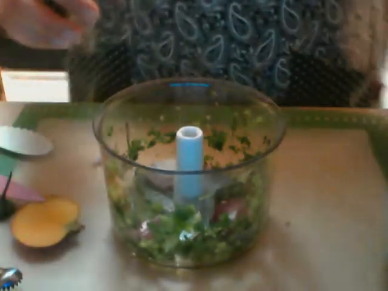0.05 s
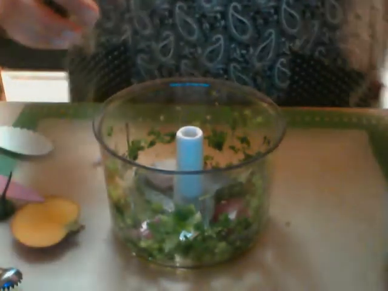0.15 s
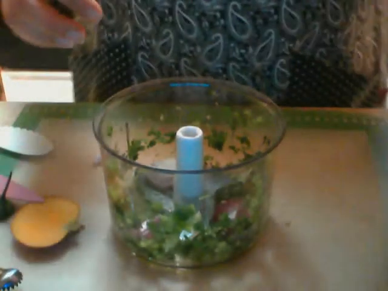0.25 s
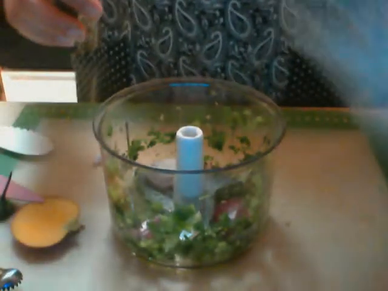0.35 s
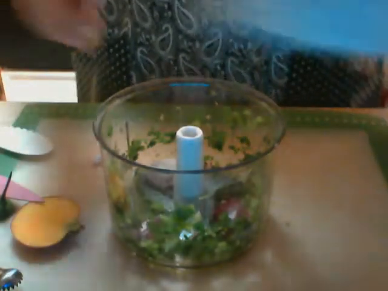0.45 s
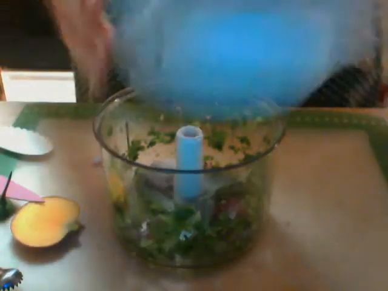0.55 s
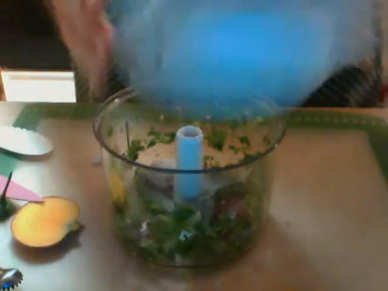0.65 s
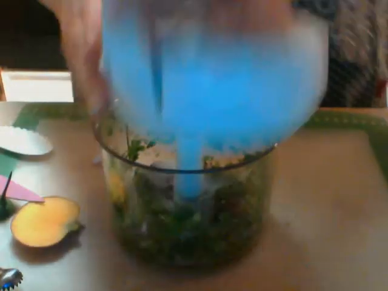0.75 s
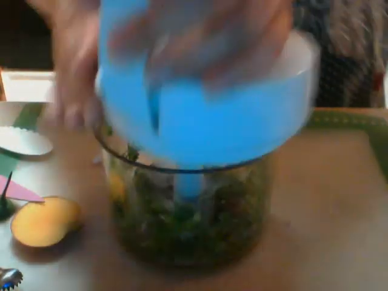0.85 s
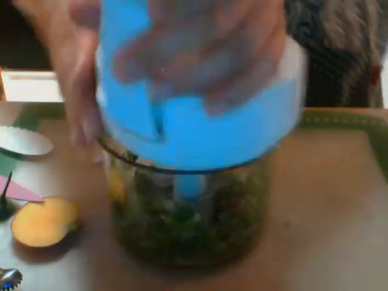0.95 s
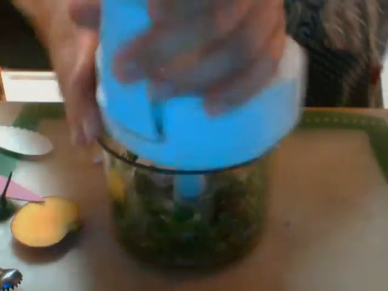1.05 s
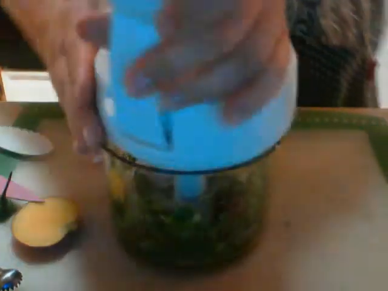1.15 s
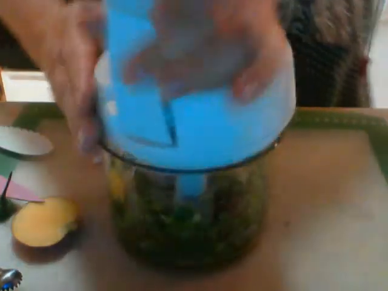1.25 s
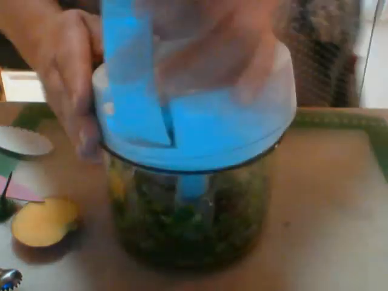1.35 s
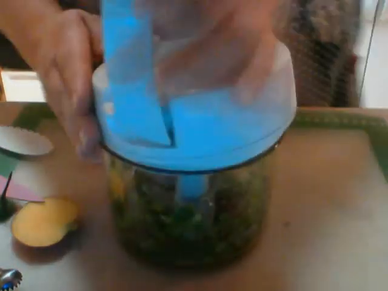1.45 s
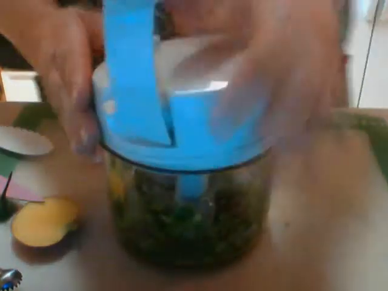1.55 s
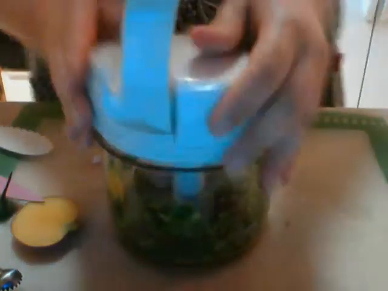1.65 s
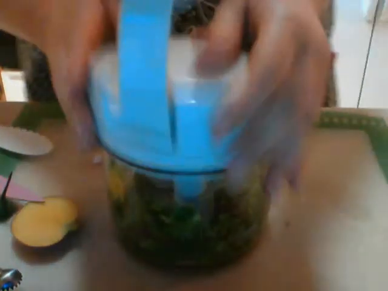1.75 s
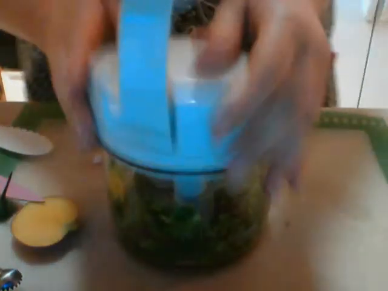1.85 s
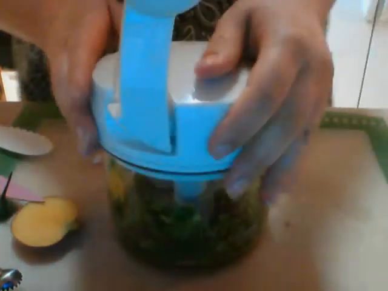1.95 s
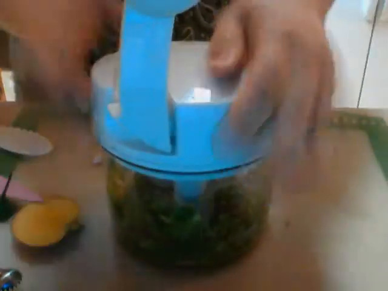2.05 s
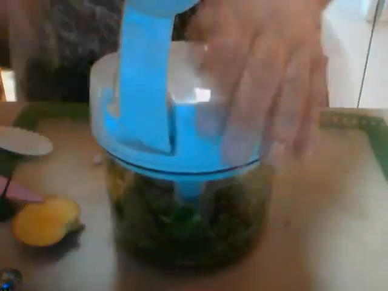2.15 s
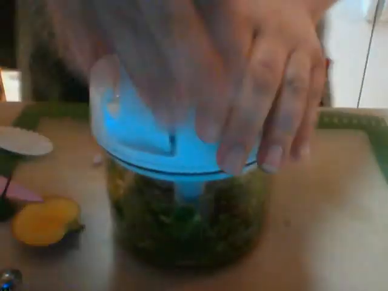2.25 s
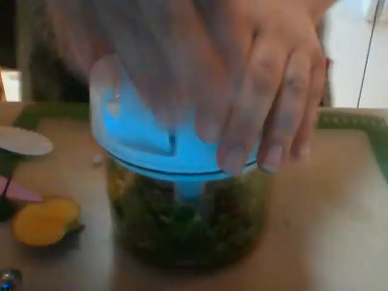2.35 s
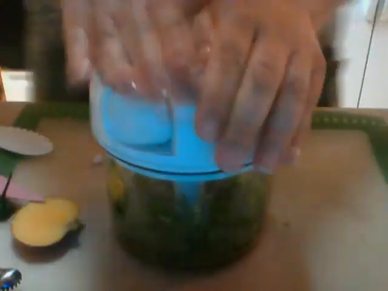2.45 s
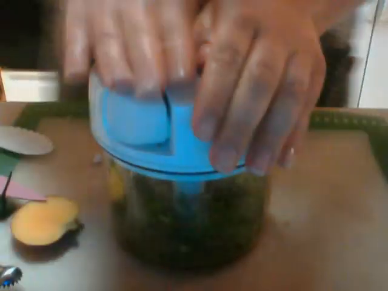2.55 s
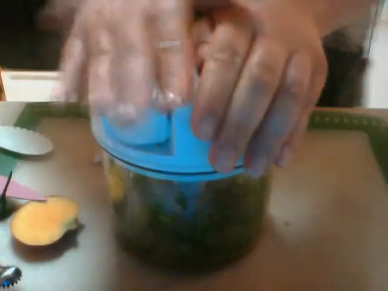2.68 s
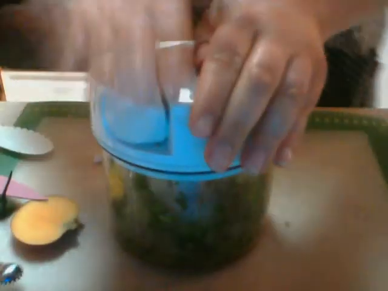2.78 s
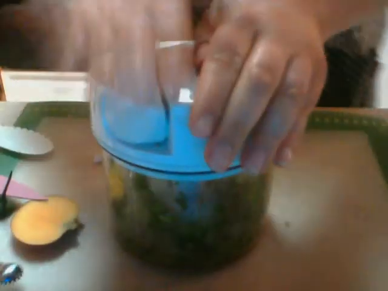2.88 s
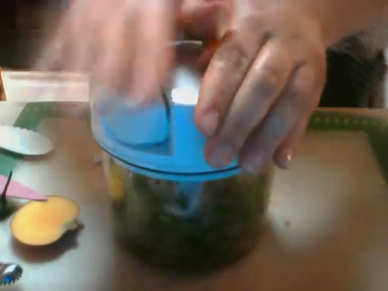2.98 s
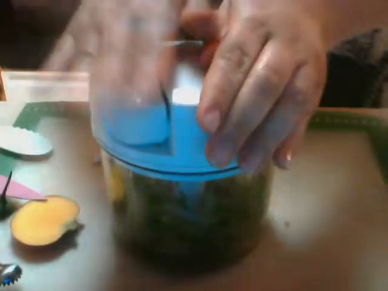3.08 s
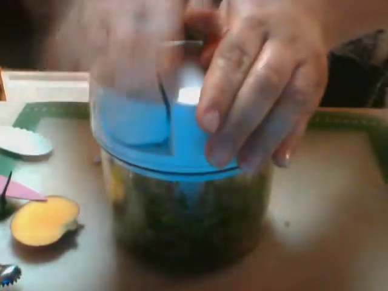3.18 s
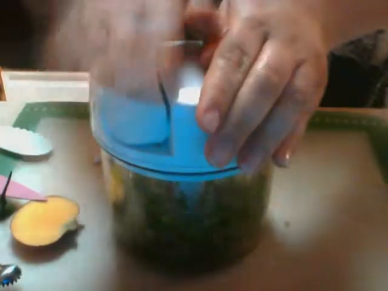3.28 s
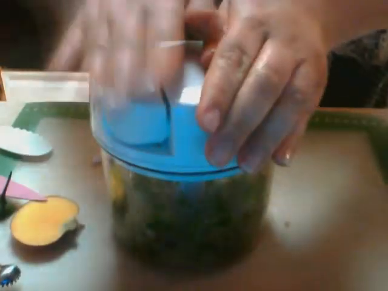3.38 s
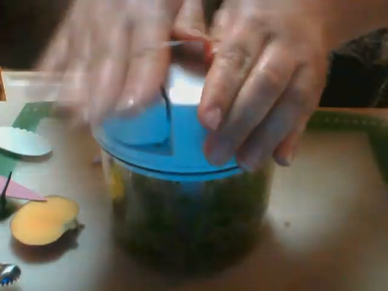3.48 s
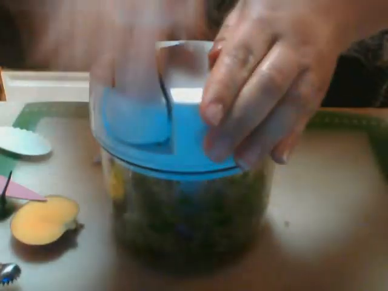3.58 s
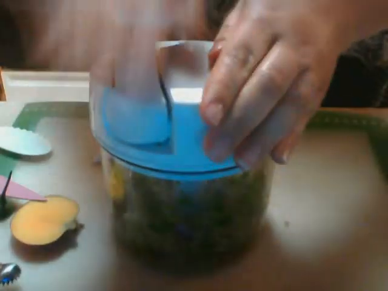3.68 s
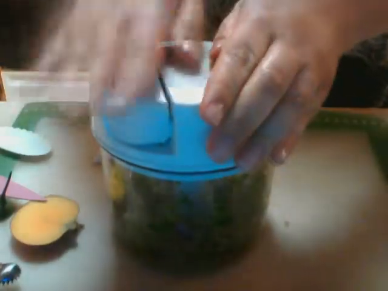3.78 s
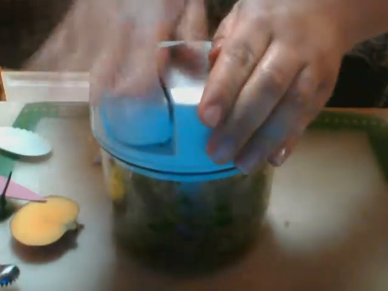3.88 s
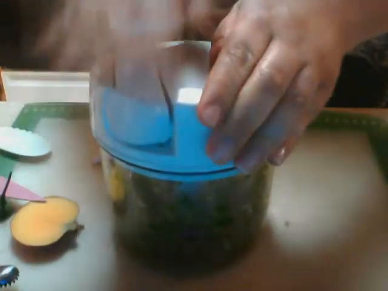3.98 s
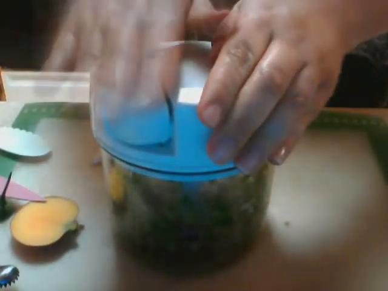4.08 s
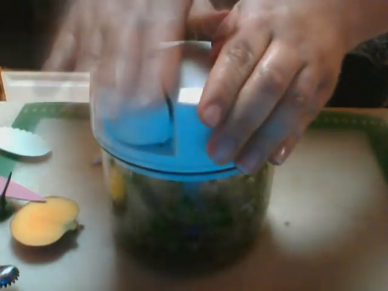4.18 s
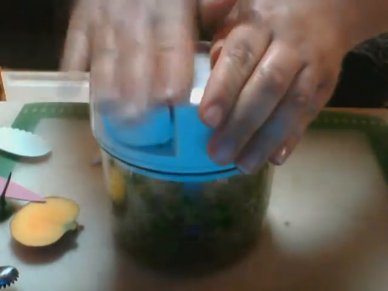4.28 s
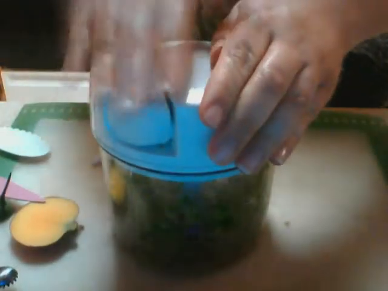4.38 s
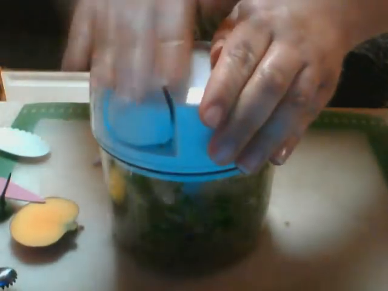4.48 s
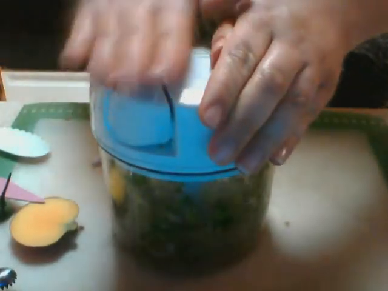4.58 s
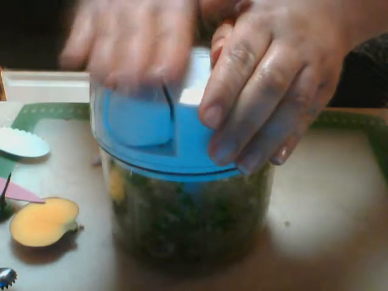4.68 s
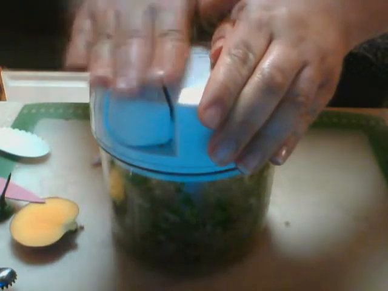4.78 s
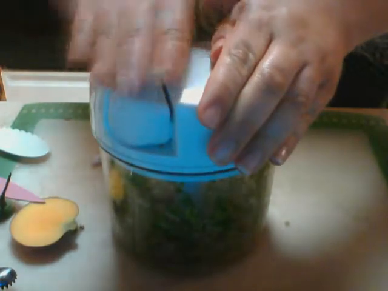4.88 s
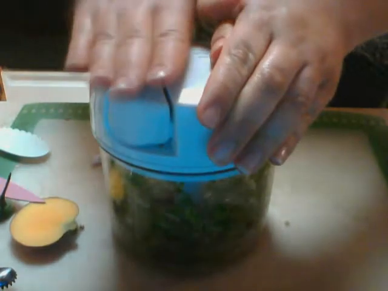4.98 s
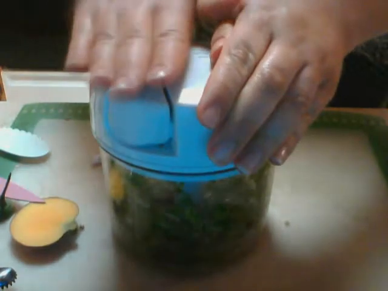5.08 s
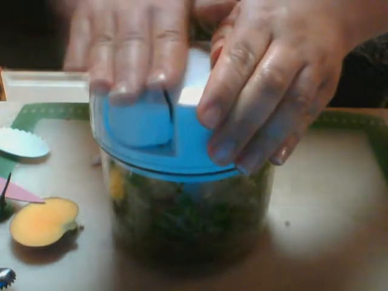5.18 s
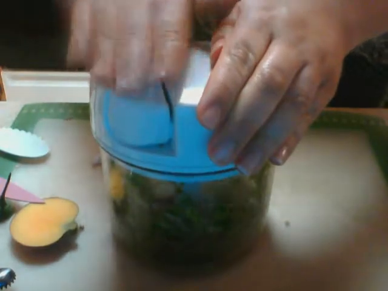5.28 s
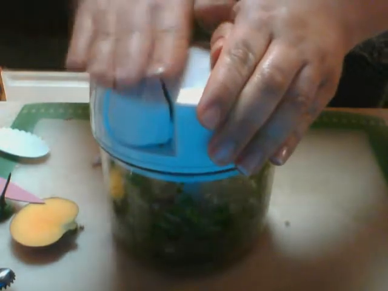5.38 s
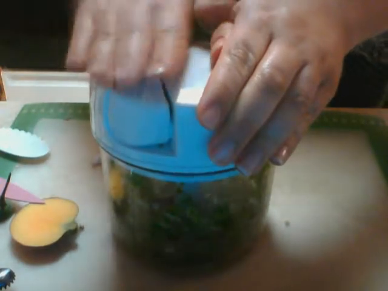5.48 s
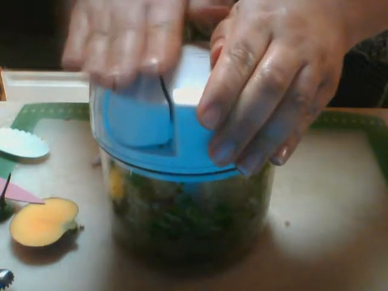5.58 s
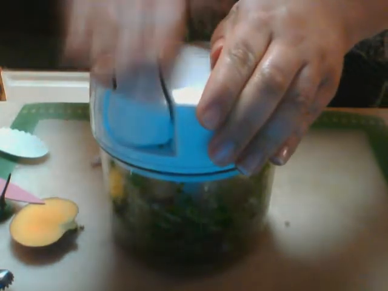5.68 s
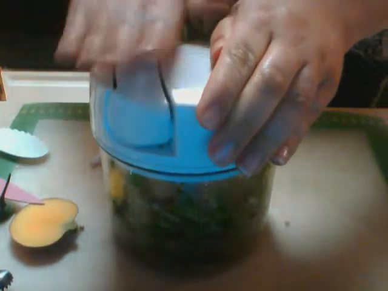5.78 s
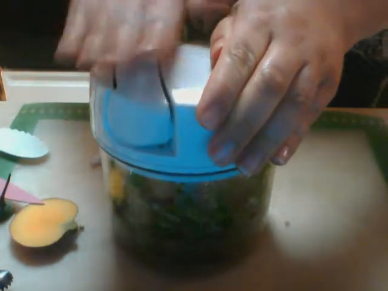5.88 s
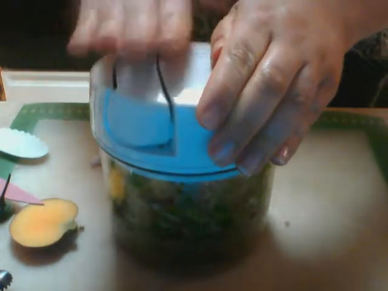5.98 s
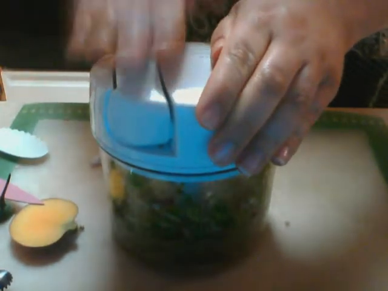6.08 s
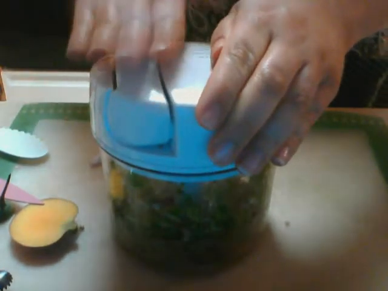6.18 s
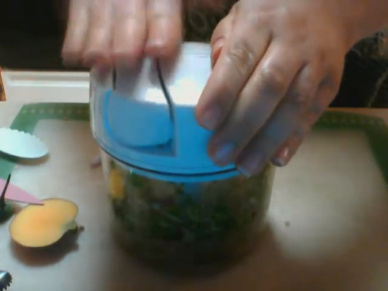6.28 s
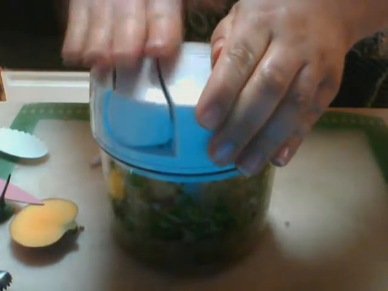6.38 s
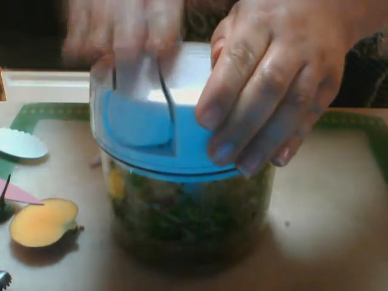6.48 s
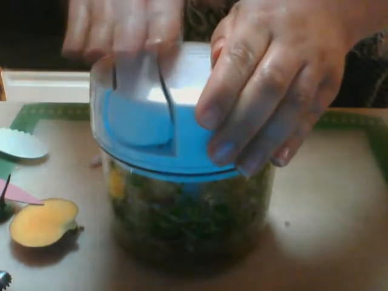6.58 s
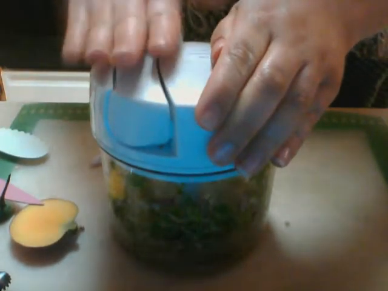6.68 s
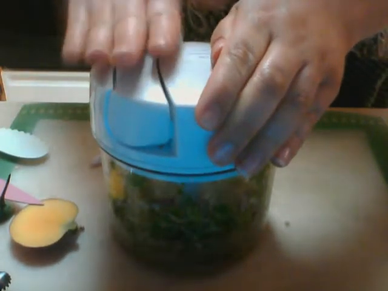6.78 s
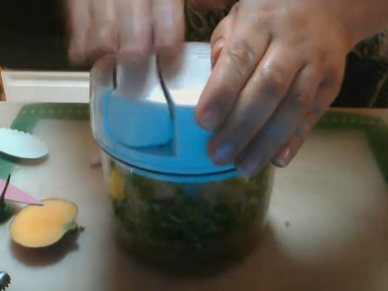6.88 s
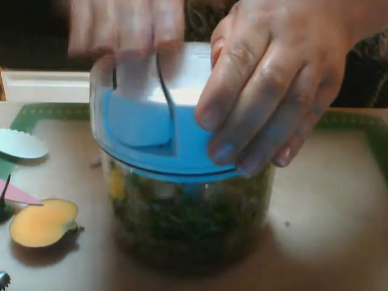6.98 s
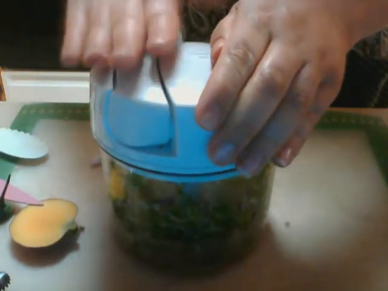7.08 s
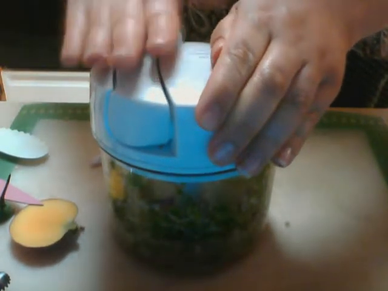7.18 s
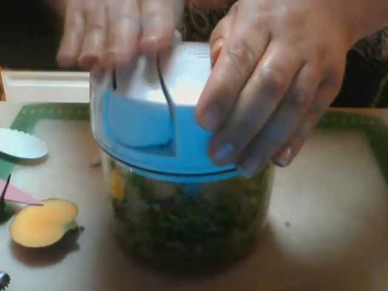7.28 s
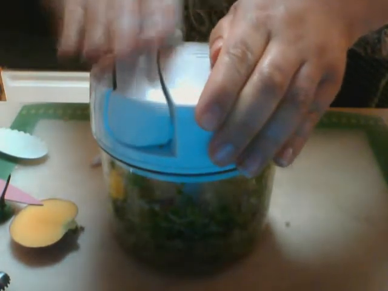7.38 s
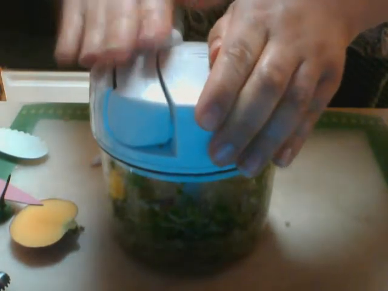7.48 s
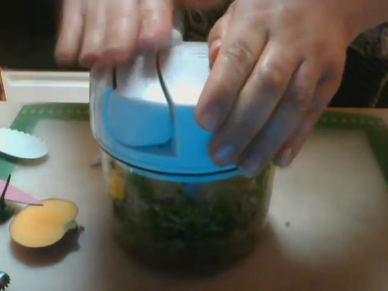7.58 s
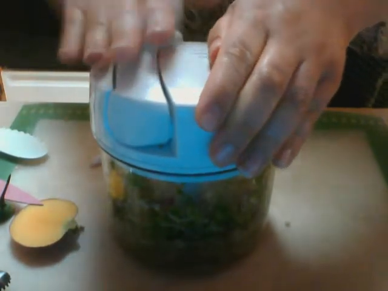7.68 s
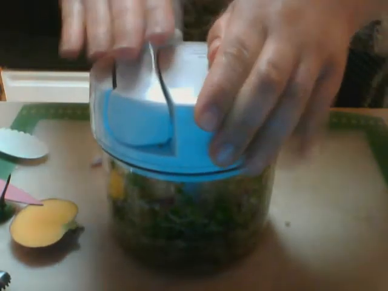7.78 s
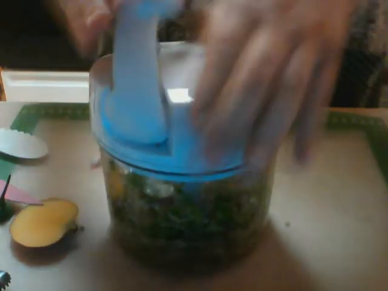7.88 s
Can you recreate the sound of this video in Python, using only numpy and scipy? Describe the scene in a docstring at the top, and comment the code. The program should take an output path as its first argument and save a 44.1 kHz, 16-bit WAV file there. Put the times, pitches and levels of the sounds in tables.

```python
"""A hand-pumped vegetable chopper on a cutting board, close to a small microphone, over faint whine and hiss.
A ring dies away and fingers rustle as the lid is lifted, set on the plastic bowl and twisted shut: noise cracks
over damped tones, with short slides. Then a palm pumps the lever: blades swish and rumble as filtered noise,
gear teeth click and grind, and each landing palm thumps the board with low damped tones. After each push the lever
springs back in a run of ratchet clicks and hits its stop. Near walls answer the handling and the pumping."""
import sys
import numpy as np
from scipy import signal
from scipy.fft import rfft, irfft, next_fast_len
from scipy.io import wavfile
from scipy.ndimage import uniform_filter1d, map_coordinates

SR = 44100
rng = np.random.default_rng(int(sys.argv[2]) if len(sys.argv) > 2 else 0)


def master_out(mix):
    """Clip the mix to full scale and print it as 16-bit PCM to the path in sys.argv[1]."""
    frames = np.transpose(np.atleast_2d(mix))
    ceiling = np.clip(frames, -1, 1)
    pcm = np.round(ceiling * 32767).astype(np.int16)
    wavfile.write(sys.argv[1], SR, pcm)


N = 350230


def amp(db):
    """dB to gain."""
    return 10 ** (np.asarray(db) / 20)


def unit(x):
    """Scaled to rms 1."""
    return x / np.sqrt(np.mean(x ** 2) + 1e-20)


def noise():
    """White noise as long as the scene."""
    return rng.standard_normal(N)


def along(points, hz):
    """Read (frequency [Hz], value) points on a log frequency axis."""
    f, v = np.transpose(points)
    return np.interp(np.log(hz + 1), np.log(f + 1), v)


def peaks(table, hz):
    """Colour in dB of resonances (frequency [Hz], width [Hz], level [dB])."""
    return sum(db / (1 + (2 * (hz - centre) / width) ** 2) for centre, width, db in table)


def wobble(rate):
    """A smooth random curve with rate knots a second."""
    knots = rng.standard_normal(int(N * rate / SR) + 4)
    return map_coordinates(knots, [np.arange(N) * rate / SR])


def coloured(x, db_of):
    """x through the causal, minimum-phase filter whose gain in dB is db_of(Hz)."""
    m = next_fast_len(N + SR // 2) * 2
    gain_db = np.maximum(db_of(np.fft.rfftfreq(m, 1 / SR)), -120)
    cepstrum = irfft(np.log(amp(gain_db)), m)
    # folding the cepstrum forward keeps all of the response after the blow
    cepstrum = np.concatenate([cepstrum[:1], 2 * cepstrum[1:m // 2], np.zeros(m // 2)])
    return irfft(rfft(x, m) * np.exp(rfft(cepstrum)), m)[:N]


def bursts(times, db, t60, rise):
    """Envelope of blows that rise fast and die away; energies add."""
    power, t = np.zeros(N + SR), np.arange(SR // 5) / SR
    for s, level, life in zip(times, db, np.broadcast_to(t60, len(times))):
        blow = amp(level - 60 * t / life) * (1 - np.exp(-t / rise))
        power[round(s * SR):][:len(t)] += blow ** 2
    return np.sqrt(power[:N])


def rings(times, db, hz, t60, rise):
    """One damped tone for each blow."""
    out, t = np.zeros(N + SR), np.arange(SR // 4) / SR
    for s, level, f, life in np.broadcast(times, db, hz, t60):
        envelope = amp(level - 60 * t / life) * (1 - np.exp(-t / rise))
        out[round(s * SR):][:len(t)] += envelope * np.sin(2 * np.pi * f * t)
    return out[:N]


def stretches(start, end, db, fade_db):
    """Envelope of steady friction that sags by fade_db; 2 ms smoothing rounds both edges."""
    level = np.zeros(N)
    for a, b, top in zip(start, end, db):
        a, b = round(a * SR), round(b * SR)
        level[a:b] = amp(top - np.linspace(0, fade_db, b - a))
    fade = np.exp(-1 / (0.002 * SR))
    return signal.lfilter([1 - fade], [1, -fade], level)


def split(hz, side):
    """dB of one half of the band around 2100 Hz: positive keeps the bright crack, negative the mid clack."""
    return -10 * np.log10(1 + (2100 / (hz + 1)) ** (6 * side))


def clatter(crack, clack, colour):
    """Plastic on plastic: noise under a bright and a mid envelope, ringing in the given colour."""
    out = 0
    for side, envelope in ((1, crack), (-1.11, clack)):
        half = lambda hz: colour(hz) + split(hz, side)
        loudness = np.std(coloured(noise(), half))
        out = out + coloured(envelope * noise(), half) / loudness
    return out


# hiss colour: (frequency [Hz], relative level [dB])
HISS = [(35, -78), (60, -39), (202, -11), (413, -12.5), (478, -9), (565, -16), (916, -15), (2720, -22.5),
        (6300, -19.5), (9000, -35.5), (11700, -66.5), (19800, -120)]
# thin steady tones: (frequency [Hz], level before WHINE_LIFT_DB [dB])
WHINE = [(296.1, -96), (484.5, -85.5), (635.2, -93), (1082, -100.5), (2164, -102), (4867, -100),
         (5992, -104), (6487, -101)]
HISS_DB, WHINE_LIFT_DB = -76.5, 7.5  # hiss in dB rms


def background():
    """Coloured-noise hiss and a few thin sine tones, slightly wavering in level."""
    t = np.arange(N) / SR
    tones = 0
    for hz, db in WHINE:
        tones = tones + amp(db + WHINE_LIFT_DB + 1.5 * wobble(8)) * np.sin(2 * np.pi * hz * t)
    return tones + amp(HISS_DB) * unit(coloured(noise(), lambda hz: along(HISS, hz)))


# one ring dying away as the scene opens: (time [s], level [dB], frequency [Hz], t60 [s])
FADING_TONE = (0, -46, 1450, .25)


def fading_tone():
    """A single damped resonance."""
    at, db, hz, t60 = FADING_TONE
    return rings(at, db, hz, t60, .002)


# fingers sliding on the lid, one list per touch: (time [s], level before RUSTLE_LIFT_DB [dB])
RUSTLE = [
    [(0.0, -49.5), (0.098, -52), (0.12, -49), (0.234, -76), (0.3, -80)],
    [(1.56, -69.5), (1.638, -58.5), (1.756, -47), (1.776, -51), (1.814, -33), (1.896, -48), (1.936, -65),
     (2.0, -74.5)],
]
RUSTLE_LIFT_DB = 3


def rustle():
    """Dull, lumpy friction of skin on plastic."""
    t = np.arange(N) / SR
    level = sum(amp(np.interp(t, *np.transpose(touch), left=-120, right=-120)) for touch in RUSTLE)
    # (frequency [Hz], relative level [dB])
    skin = [(120, -29), (300, 2), (800, 2.5), (1600, -6), (3500, -24), (7000, -30), (9000, -73)]
    lumpy = amp(4.6 * wobble(54)) * noise()
    return amp(RUSTLE_LIFT_DB) * level * unit(coloured(lumpy, lambda hz: along(skin, hz)))


# the hardest knock snaps brightly: (time [s], level [dB], frequency [Hz], t60 [s])
SNAP = (0.1932, 5, 5300, .005)


def snap():
    """A very short, high damped tone."""
    at, db, hz, t60 = SNAP
    return rings(at, db, hz, t60, .0003)


# lid sliding on the rim: (start [s], end [s], bright level [dB], mid level [dB])
SLIDES = [(.205, .265, -51, -48), (.96, 1.023, -56, -54), (1.329, 1.45, -41, -39), (1.574, 1.64, -52, -54),
          (1.844, 1.95, -40, -38)]
SLIDE_FADE_DB = 23  # from its start to its end


def slides():
    """Bright and mid envelopes of grainy friction, fading as the lid slows down."""
    start, end, bright_db, mid_db = np.transpose(SLIDES)
    grain = amp(2.2 * wobble(150))
    bright = grain * stretches(start, end, bright_db, SLIDE_FADE_DB)
    mid = grain * stretches(start, end, mid_db, SLIDE_FADE_DB)
    return bright, mid


# handling knocks; hollow and wall pitch change with how the lid is held and how far it covers the bowl:
# (time [s], bright crack [dB], mid clack [dB], hollow level [dB], hollow pitch [Hz], wall level [dB],
# wall pitch [Hz])
KNOCKS = [(0.0074, -42, -37.5, -35.5, 262, -40.5, 736), (0.0454, -33, -25, -34, 259, -36, 1202),
          (0.0575, -34.5, -30, -31, 240, -34, 750), (0.1395, -44, -31, -23.5, 334, -28, 760),
          (0.1516, -58.5, -41.5, -23.5, 330, -22, 792), (0.1643, -61.5, -36.5, -20.5, 260, -22, 677),
          (0.1927, -8, -14, -5, 301, -15, 705), (0.198, -26, -20, -9.5, 312, -15, 628),
          (0.7877, -43.5, -75, -75.5, 472, -75, 740), (0.8854, -53.5, -56, -74, 488, -69, 660),
          (0.9525, -32.5, -30, -25, 580, -18.5, 622), (0.961, -56, -34.5, -18.5, 491, -20.5, 610),
          (0.9903, -56, -55, -34.5, 423, -30, 646), (1.034, -74.5, -55, -40.5, 430, -41.5, 860),
          (1.076, -39.5, -32, -33, 490, -31, 810), (1.1931, -37, -34, -24, 471, -47, 1110),
          (1.228, -33, -34, -17, 473, -32, 830), (1.278, -59, -51, -35.5, 488, -39, 622),
          (1.291, -46.5, -39, -37, 453, -33.5, 630), (1.3068, -33.5, -20, -13.5, 464, -19, 633),
          (1.3131, -19.5, -19.5, -5.5, 384, -14.5, 1013), (1.351, -50, -44, -28, 400, -27, 633),
          (1.4053, -64, -52, -31, 370, -37, 676), (1.4605, -77, -62, -41.5, 422, -44, 630),
          (1.587, -41, -37, -34.5, 372, -35.5, 880), (1.6094, -47, -34, -27.5, 400, -21.5, 1010),
          (1.6448, -41.5, -33, -16, 381, -20.5, 728), (1.703, -67, -43, -28, 463, -23, 1077),
          (1.721, -68, -38, -25, 475, -23, 950), (1.7552, -58, -37, -27, 434, -36, 730),
          (1.7781, -28, -32, -20.5, 424, -29, 1217), (1.7967, -20.5, -15, -24, 370, -29, 785),
          (1.8174, -25.5, -26, -22, 383, -19.5, 1500), (1.8312, -26.5, -25, -22, 422, -21, 640),
          (1.8429, -21.5, -18.5, -20.5, 242, -22, 748), (1.957, -52.5, -55, -51, 480, -53, 650),
          (2.1868, -51, -41, -49, 477, -55.5, 858), (2.2797, -77, -65, -66, 610, -55.5, 1120),
          (2.31, -55, -43, -62, 483, -50, 1180), (2.343, -48, -34, -31, 430, -33, 1090),
          (2.377, -35.5, -30, -33, 540, -24.5, 760)]
# colour of a knock: (frequency [Hz], relative level [dB])
RIM = [(500, -13), (1200, -0.5), (1700, -3.5), (2800, -3.5), (4500, -5), (6000, -4), (7300, -16),
       (8800, -50), (12000, -100)]
# rim resonances: (frequency [Hz], width [Hz], level [dB])
RIM_PEAKS = [(1600, 300, 4), (2700, 200, 7), (4200, 300, 4), (5800, 400, 4)]
HOLLOW_T60, WALL_T60, CLACK_T60 = .064, .04, .039  # s
CRACK_T60 = .028  # s, for a crack at -40 dB
HARD_SHORTER = .08  # dB of crack length lost for each dB above -40: hard blows are brief


def knocks():
    """The lid meets the rim: the air in the bowl and the wall ring under each crack."""
    s, crack_db, clack_db, hollow_db, hollow_hz, wall_db, wall_hz = np.transpose(KNOCKS)
    hollow = rings(s, hollow_db, hollow_hz, HOLLOW_T60, 0.00091)
    wall = rings(s, wall_db, wall_hz, WALL_T60, 0.00058)
    crack_t60 = CRACK_T60 * amp(-HARD_SHORTER * (crack_db + 40))
    bright_slide, mid_slide = slides()
    crack = np.hypot(bursts(s, crack_db, crack_t60, 0.00074), bright_slide)
    clack = np.hypot(bursts(s, clack_db, CLACK_T60, 0.00073), mid_slide)
    rim = lambda hz: along(RIM, hz) + peaks(RIM_PEAKS, hz)
    return hollow + wall + snap() + clatter(crack, clack, rim)


# decay of the walls' answer: (frequency [Hz], t60 [s])
KITCHEN = [(150, 0.19), (500, 0.16), (2000, 0.091), (7000, 0.052)]


def kitchen(x):
    """The near walls answer, each frequency dying at its own speed; overlapping slices get fresh random tails."""
    out, step = np.zeros(N + SR), SR // 8
    window = np.hanning(2 * step)
    x = np.pad(x, (step, 2 * step))
    for at in range(0, N + step, step):
        hz, t, z = signal.stft(rng.standard_normal(SR // 3), SR, nperseg=256)
        decay = amp(-60 * t / along(KITCHEN, hz)[:, None])
        tail = signal.istft(z * decay, SR, nperseg=256)[1]
        answer = signal.fftconvolve(x[at:at + 2 * step] * window, tail / np.linalg.norm(tail))
        out[at + 200:][:len(answer)] += answer  # 200 samples, about 4.5 ms late
    return out[step:step + N]


# gearbox colour: (frequency [Hz], relative level [dB])
GEARBOX = [(290, -31), (500, -5.5), (1170, -1), (1370, 2.5), (2140, -8.5), (2950, -8.5), (3680, -11),
           (4060, -5.5), (4770, -14), (5660, -4.5), (7330, -23.5), (8820, -51.5), (9500, -63.5),
           (12400, -100), (20900, -120)]
# lid resonances: (frequency [Hz], width [Hz], level [dB])
SHELL = [(1037, 85, 1.5), (1320, 140, 0), (1750, 110, 1.5), (2525, 61, 6.5), (2950, 190, 5), (3420, 140, 5),
         (4070, 100, -0.5), (5750, 300, -0.5)]


def plastic(hz):
    """The gearbox colour with the lid resonances, in dB."""
    return along(GEARBOX, hz) + peaks(SHELL, hz)


# rumble colour: (frequency [Hz], relative level [dB])
RUMBLE = [(35, -61.5), (60, -34.5), (100, -15), (172, -4.5), (236, -0.5), (280, -5), (347, 4), (499, -4.5),
          (900, -14.5), (1170, -41.5), (1980, -120)]
# blades coasting in the leaves: (time [s], swish before SWISH_DB [dB], rumble before RUMBLE_DB [dB])
COAST = [(2.33, -67, -79), (2.55, -31, -36), (2.63, -26, -37.5), (2.88, -34, -34), (3.2, -39, -37),
         (3.8, -30, -36.5), (4.06, -34, -36), (4.95, -32, -37), (5.45, -27, -34.5), (7.38, -26, -36),
         (7.59, -25.5, -36), (7.94, -40, -43.5)]
# the blades start from rest: (start [s], end [s], then levels at the start: bright grind [dB],
# mid grind [dB], rumble [dB])
FIRST_PUSH = [(2.335, 2.46, -56, -47, -49)]
SWISH_DB, RUMBLE_DB = -7, -1.5  # offsets to the coasting levels
KICK_DB, KICK_T60 = -7, 0.32  # each push speeds the blades: rumble against the upper board modes; decay in s
SPIN_UP_DB = 22  # growth over the first push


def blades():
    """The turning blades swish through leaves and rumble, surging with each push."""
    at, swish_db, rumble_db = np.transpose(COAST)
    level = lambda db: amp(np.interp(np.arange(N) / SR, at, db, left=-120))
    landing, _, upper_db, *_ = np.transpose(PUSHES)
    kick = bursts(landing, upper_db + KICK_DB, KICK_T60, 0.0073)
    start, stop, *_, first_db = np.transpose(FIRST_PUSH)
    churn = np.hypot(level(rumble_db + RUMBLE_DB), kick) + stretches(start, stop, first_db, -SPIN_UP_DB)
    swish = unit(coloured(noise(), plastic))
    rumble = unit(coloured(amp(2.5 * wobble(40)) * noise(), lambda hz: along(RUMBLE, hz)))
    return level(swish_db + SWISH_DB) * swish + churn * rumble


BITE_S, PART_S = 0.014, 0.011  # bright grind starts after landing, all drive grind ends before release
DRIVE_FADE_DB = 6  # sag of the mid grind
RATCHET_BED_DB = -14  # grind under the ratchet clicks


def mesh():
    """Bright and mid envelopes of the grinding, while the palm drives and while the ratchet runs."""
    s, *_, bright_db, mid_db, end, _ = np.transpose(PUSHES)
    first, last, _, crack_db, clack_db, *_ = np.transpose(RETURNS)
    start, stop, *first_db, _ = np.transpose(FIRST_PUSH)
    bed = []
    for run_db, start_db in zip((crack_db, clack_db), first_db):
        run = stretches(first, last + TOOTH_S, run_db + RATCHET_BED_DB, fade_db=5)
        bed.append(run + stretches(start, stop, start_db, -SPIN_UP_DB))
    bright = stretches(s + BITE_S, end - PART_S, bright_db, fade_db=5)
    mid = stretches(s, end - PART_S, mid_db, DRIVE_FADE_DB)
    return bed[0] + bright, bed[1] + mid


# single clicks: (time [s], crack [dB], clack [dB])
LOOSE = [(2.435, -29, -24), (2.6385, -24, -18.5), (5.502, -20, -24), (6.439, -24, -26),
         (7.9135, -23.5, -22)]
# the palm pushes the lever down: (landing [s], lower board modes [dB], upper board modes [dB],
# landing crack [dB], landing clack [dB], hardest tooth [s], its crack [dB], bright grind [dB],
# mid grind [dB], release [s], release tick [dB])
PUSHES = [(2.446, -30.5, -21.5, -23, -20.5, 2.4885, -17.5, -26, -23, 2.53, -22),
          (2.688, -36, -20, -21.5, -19, 2.7263, -17, -29, -25.5, 2.76, -15),
          (2.894, -25, -24, -16.5, -14, 2.9494, -16.5, -26.5, -27, 2.975, -26),
          (3.082, -27, -28.5, -24, -18.5, 3.1106, -30, -38, -31.5, 3.126, -16.5),
          (3.264, -30, -26.5, -28, -23, 3.2937, -17, -30, -27.5, 3.31, -32),
          (3.447, -29, -21, -34, -24, 3.4853, -17.5, -26, -25, 3.525, -22),
          (3.661, -33, -23, -17, -13.5, 3.6887, -11.5, -29, -23.5, 3.731, -21.5),
          (3.868, -24, -23, -20, -16.5, 3.8949, -13.5, -22.5, -24, 3.927, -16),
          (4.045, -28.5, -31, -20.5, -15.5, 4.0592, -32, -47.5, -36, 4.085, -42),
          (4.234, -22, -15, -14.5, -13, 4.2661, -13, -24.5, -24.5, 4.306, -22),
          (4.413, -30, -26, -25, -22, 4.424, -25.5, -42, -31.5, 4.462, -24),
          (4.603, -26.5, -25.5, -27, -17.5, 4.64, -19, -34, -29.5, 4.673, -26),
          (4.796, -22.5, -23.5, -28, -17, 4.8218, -22.5, -27.5, -30.5, 4.843, -22),
          (4.984, -25.5, -31, -29, -24, 5.0141, -21, -34, -28.5, 5.035, -19),
          (5.18, -23, -23.5, -24, -20, 5.2257, -26, -27, -26.5, 5.246, -27),
          (5.366, -24, -23.5, -20, -16.5, 5.3857, -16, -27.5, -29, 5.438, -24.5),
          (5.556, -18, -19, -17, -16, 5.5936, -17, -26, -26, 5.623, -21.5),
          (5.743, -23, -23, -20, -15.5, 5.7636, -18, -25.5, -30, 5.807, -17),
          (5.93, -22, -19, -13, -13.5, 5.9802, -21.5, -26, -28, 6.002, -25),
          (6.118, -24, -26.5, -15.5, -18, 6.1382, -14, -26, -28, 6.183, -16),
          (6.31, -22, -22, -13, -9, 6.3338, -14, -26.5, -31, 6.368, -17),
          (6.5, -24, -18.5, -11.5, -13, 6.5214, -16, -26.5, -26, 6.571, -17),
          (6.701, -25, -19.5, -10.5, -9, 6.7604, -19.5, -23.5, -27, 6.777, -22),
          (6.891, -23, -23, -13, -11.5, 6.9041, -16, -26, -26.5, 6.964, -17),
          (7.077, -22, -21, -12.5, -12.5, 7.116, -20, -24.5, -28, 7.148, -15.5),
          (7.261, -25, -23, -15, -15, 7.3149, -15, -24, -24, 7.327, -16),
          (7.448, -24.5, -23.5, -15.5, -8, 7.4724, -18, -23, -26.5, 7.532, -18),
          (7.656, -24.5, -25, -16, -16, 7.6764, -21.5, -24, -27.5, 7.742, -19.5)]
TOOTH_S, TOOTH_JITTER = .013, .3  # drive teeth: spacing in s, its scatter as a share of the spacing
TOOTH_OVER_DB, TOOTH_SCATTER_DB = 5.5, 1  # level over the grind, and its scatter
TICK_CLACK_DB = -3.5  # clack of the release tick under its crack
TOOTH_T60, TOOTH_RISE_S = .029, .001  # s


def teeth():
    """The loose clicks and those of each push as (s, crack dB, clack dB): landing, drive teeth, release."""
    rows = list(LOOSE)
    chance = rng.standard_normal((len(PUSHES), 3, 12))
    for push, z in zip(PUSHES, chance):
        s, _, _, crack, clack, hard_s, hard, bright, mid, end, tick = push
        rows += [(s, crack, clack), (hard_s, hard, mid + TOOTH_OVER_DB), (end, tick, tick + TICK_CLACK_DB)]
        at = s + BITE_S + TOOTH_S * (np.arange(12) + .5 + TOOTH_JITTER * z[0])
        size = TOOTH_OVER_DB + TOOTH_SCATTER_DB * z[1:]
        # teeth stop clicking before the release
        rows += [row for row in zip(at, bright + size[0], mid + size[1]) if row[0] < end - PART_S]
    return np.transpose(rows)


# lower and upper board modes, one list each: (frequency [Hz], level against the push [dB], t60 [s])
BOARD = [(137, -5, 0.17), (179.4, 2, 0.17)], [(230.6, 0, 0.15), (377, 0, 0.043)]


def thumps():
    """The palm lands on the lever: the board booms in its modes and the bowl shudders."""
    s, low_db, high_db, *_ = np.transpose(PUSHES)
    boom = 0
    for push_db, modes in zip((low_db, high_db), BOARD):
        for hz, mode_db, t60 in modes:
            boom = boom + rings(s, push_db + mode_db, hz, t60, 0.0014)
    shudder = unit(coloured(noise(), lambda hz: along(RUMBLE, hz)))
    return boom + bursts(s, high_db + 0.5, 0.11, 0.0017) * shudder


# the lever springs back over its ratchet to the stop: (first click [s], last click [s], clicks [count],
# crack before the run's shape [dB], clack before the run's shape [dB], stop [s], stop crack [dB],
# stop clack [dB])
RETURNS = [(2.567, 2.62, 5, -19, -22, 2.658, -18, -17.5), (2.7737, 2.832, 6, -20, -22, 2.87, -9.5, -9),
           (2.987, 3.0315, 5, -18.5, -21.5, 3.063, -12.5, -11.5),
           (3.1775, 3.217, 4, -20, -19, 3.243, -12.5, -14), (3.348, 3.39, 5, -20, -19, 3.43, -9.5, -12),
           (3.546, 3.609, 6, -17.5, -21.5, 3.636, -12, -12.5),
           (3.7665, 3.81, 6, -20.5, -19.5, 3.837, -11.5, -14.5),
           (3.946, 3.996, 4, -18.5, -19.5, 4.02, -13.5, -13.5),
           (4.137, 4.174, 5, -18.5, -20, 4.206, -12, -19.5),
           (4.32, 4.3644, 5, -18.5, -18, 4.387, -15.5, -14), (4.501, 4.537, 4, -19, -18, 4.57, -17, -16),
           (4.694, 4.729, 5, -16, -19, 4.764, -11, -12), (4.879, 4.9146, 5, -18.5, -20, 4.953, -10.5, -10),
           (5.071, 5.1225, 5, -17, -18, 5.14, -14.5, -16),
           (5.257, 5.302, 5, -18.5, -19.5, 5.336, -11.5, -13),
           (5.457, 5.481, 5, -17, -21, 5.517, -13.5, -13), (5.643, 5.674, 4, -16.5, -22, 5.709, -11, -13),
           (5.8237, 5.8684, 7, -16, -18.5, 5.895, -9.5, -8.5),
           (6.017, 6.058, 6, -17.5, -19.5, 6.086, -10.5, -14),
           (6.204, 6.244, 5, -17, -17, 6.273, -13.5, -16),
           (6.393, 6.428, 4, -16.5, -16.5, 6.464, -11.5, -15.5),
           (6.593, 6.634, 7, -18, -20.5, 6.669, -10.5, -16.5),
           (6.7925, 6.828, 5, -15, -20, 6.862, -11.5, -11.5),
           (6.982, 7.017, 5, -16.5, -21, 7.051, -11.5, -12), (7.166, 7.199, 5, -17, -18, 7.236, -8.5, -20),
           (7.3377, 7.387, 5, -15, -20, 7.425, -10, -11),
           (7.544, 7.594, 7, -15.5, -20.5, 7.627, -8.5, -11.5),
           (7.753, 7.845, 7, -20, -23.5, 7.874, -19, -23)]
RATCHET_OVER_DB = 4  # top of the run's shape, over the listed level
ARCH_DB, ARCH_TOP = 2, .45  # clicks are strongest at this share of the run and weaker toward its ends
RATCHET_SCATTER_DB, RATCHET_JITTER_S = 1.5, .0004
RATCHET_T60, RATCHET_RISE_S = .022, .0012  # s; shorter than the drive teeth, so each click stands apart


def ratchet():
    """The nearly even clicks of each return as (s, crack dB, clack dB)."""
    rows = []
    chance = rng.standard_normal((len(RETURNS), 3, 12))
    for (first, last, count, crack, clack, *_), z in zip(RETURNS, chance):
        u, z = np.linspace(0, 1, round(count)), z[:, :round(count)]
        arch = RATCHET_OVER_DB - ARCH_DB * ((u - ARCH_TOP) / .5) ** 2
        size = arch + RATCHET_SCATTER_DB * z[1:]
        at = first + u * (last - first) + RATCHET_JITTER_S * z[0]
        rows += zip(at, crack + size[0], clack + size[1])
    return np.transpose(rows)


STOP_RISE_S, STOP_LEAD_S, STOP_T60 = .003, .0008, .037  # s; the stop is padded, so its click swells


def stops():
    """The lever meets its padded stop: clicks as (s, crack dB, clack dB), begun early to swell."""
    s, crack_db, clack_db = np.transpose(RETURNS)[-3:]
    return s - STOP_LEAD_S, crack_db, clack_db


PING_DB, PING_T60, PING_DETUNE = -6, .03, .05  # against the click; s; largest share of the pitch


def pings(s, crack_db, clack_db):
    """Each click rings one lid resonance picked by chance."""
    pick, detune = rng.random((len(s), 2)).T
    lid_hz = np.transpose(SHELL)[0][(pick * len(SHELL)).astype(int)]
    hz = lid_hz * (1 + PING_DETUNE * (2 * detune - 1))
    click_db = np.where(hz > 2100, crack_db, clack_db)
    return rings(s, click_db + PING_DB, hz, PING_T60, .001)


CLACK_SLOWER = 1.3  # the mid clack rises and dies this much slower than the crack


def clicks():
    """Bright and mid envelopes of all clicks, and their rings."""
    kinds = [(teeth(), TOOTH_T60, TOOTH_RISE_S),
             (ratchet(), RATCHET_T60, RATCHET_RISE_S),
             (stops(), STOP_T60, STOP_RISE_S)]
    crack_power, clack_power, ping = 0, 0, 0
    for (s, crack_db, clack_db), t60, rise in kinds:
        crack_power = crack_power + bursts(s, crack_db, t60, rise) ** 2
        clack_power = clack_power + bursts(s, clack_db, CLACK_SLOWER * t60, CLACK_SLOWER * rise) ** 2
        ping = ping + pings(s, crack_db, clack_db)
    return np.sqrt(crack_power), np.sqrt(clack_power), ping


def gears():
    """Plastic teeth click and ring over the grind of the mesh."""
    crack, clack, ping = clicks()
    grit = unit(amp(4 * wobble(300)))  # small teeth chatter
    bright, mid = mesh()
    return clatter(np.hypot(crack, grit * bright), np.hypot(clack, grit * mid), plastic) + ping


def scene():
    """The chopper in its room."""
    handling = fading_tone() + rustle() + knocks()
    pumping = blades() + gears() + thumps()
    chopper = handling + pumping
    return (background() + chopper + amp(-12.5) * kitchen(chopper))[None]


def suppress(x, gate_db, depth_db):
    """A noise suppressor turns down every band that falls under its gate, by depth_db at most."""
    z = signal.stft(x, nperseg=256)[2]
    power = uniform_filter1d(uniform_filter1d(abs(z) ** 2, size=9, axis=0), size=5, axis=1)
    # squared power, a fourth power of amplitude, makes the gate steep
    gain = np.maximum(power ** 2 / (power ** 2 + amp(4 * gate_db)), amp(-depth_db))
    return signal.istft(z * gain, nperseg=256)[1][:N]


TOP_HZ = 16800  # upper band limit


def record(dry):
    """A microphone without deep bass, noise suppression, soft clipping of the highest peaks, and a band limit."""
    thin = coloured(dry[0], lambda hz: -10 * np.log10(1 + (105 / (hz + 1)) ** 12))
    quiet = suppress(thin, gate_db=-96.875, depth_db=7.5)  # gate on the amplitude of each band
    clipped = quiet / (1 + abs(quiet / .98) ** 8) ** (1 / 8)
    m = next_fast_len(N + SR // 2)
    in_band = np.fft.rfftfreq(m, 1 / SR) < TOP_HZ
    return irfft(rfft(clipped, m) * in_band, m)[None, :N]


dry = scene()
out = record(dry)
master_out(out)
```